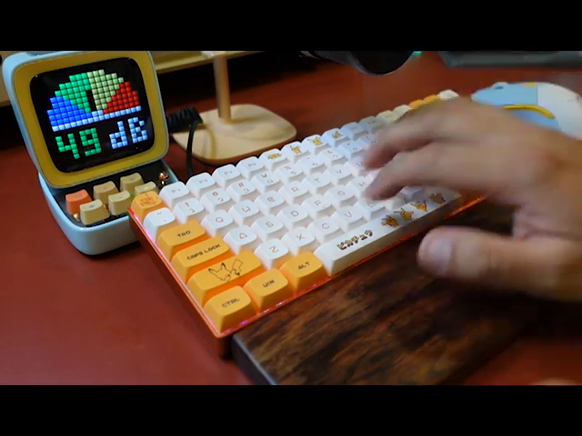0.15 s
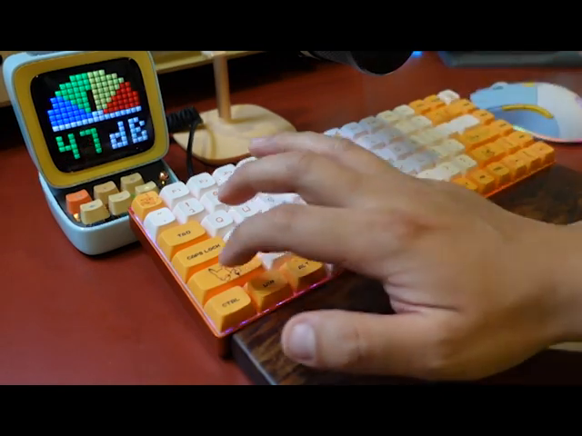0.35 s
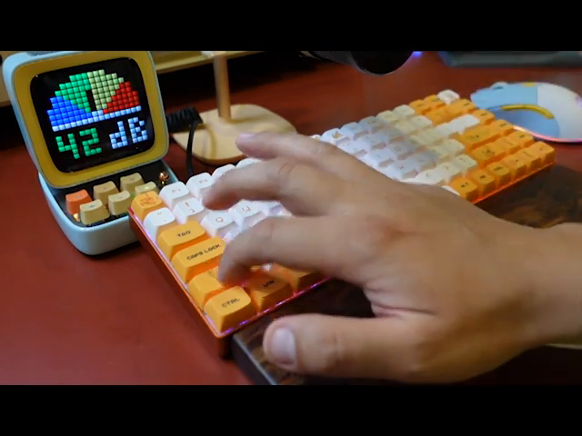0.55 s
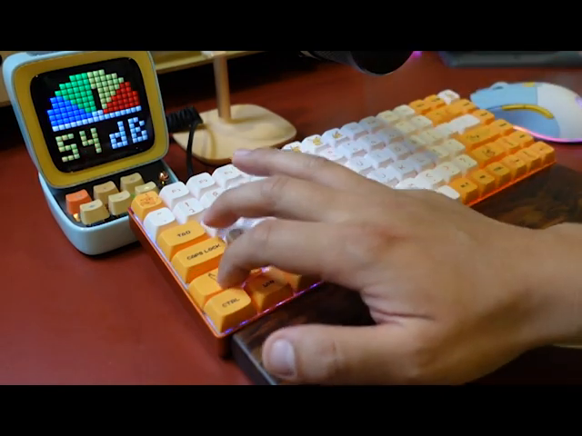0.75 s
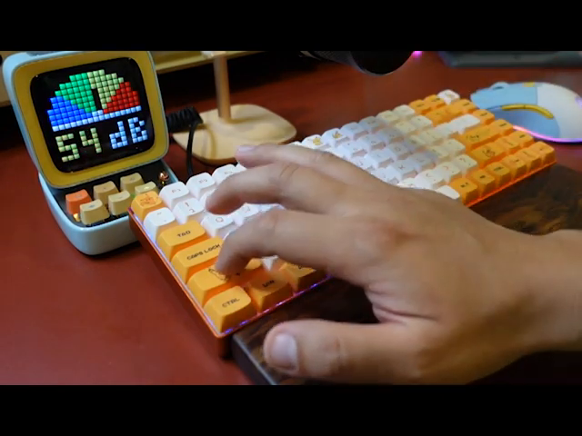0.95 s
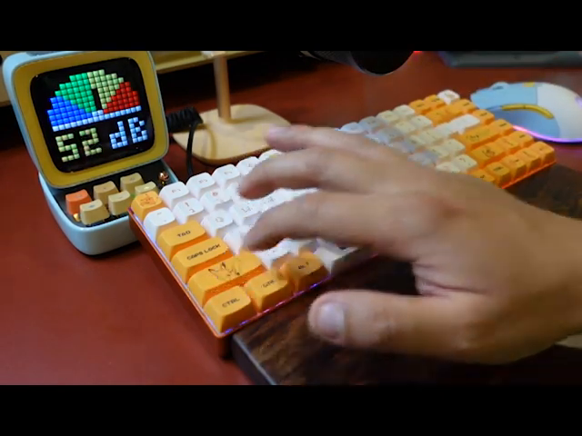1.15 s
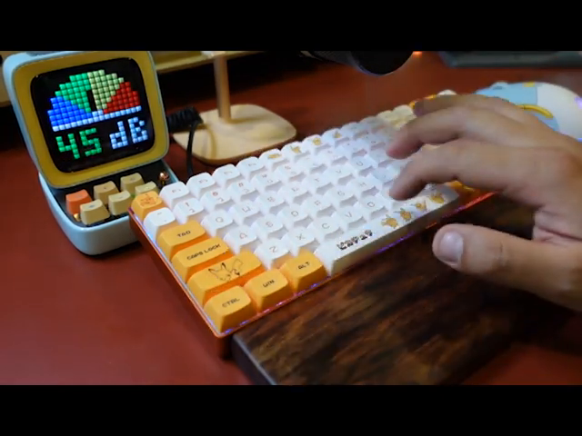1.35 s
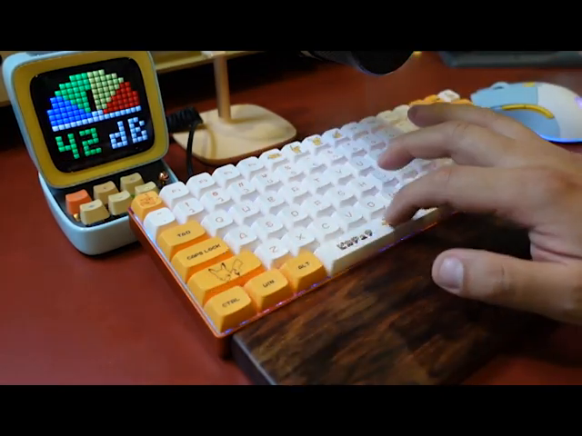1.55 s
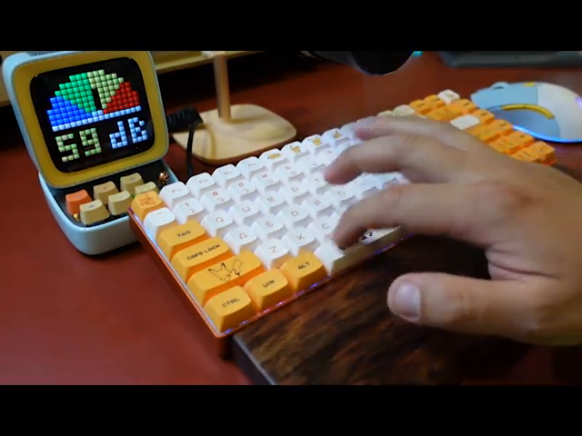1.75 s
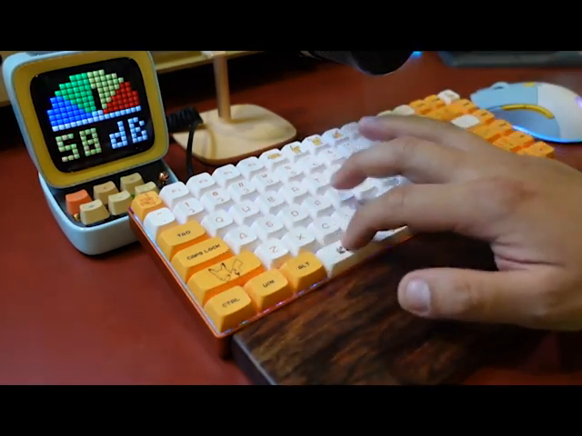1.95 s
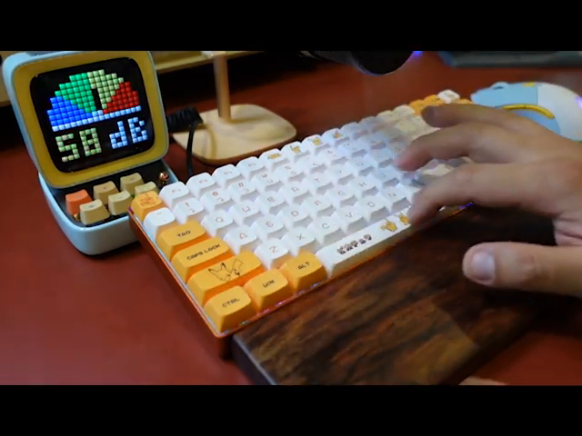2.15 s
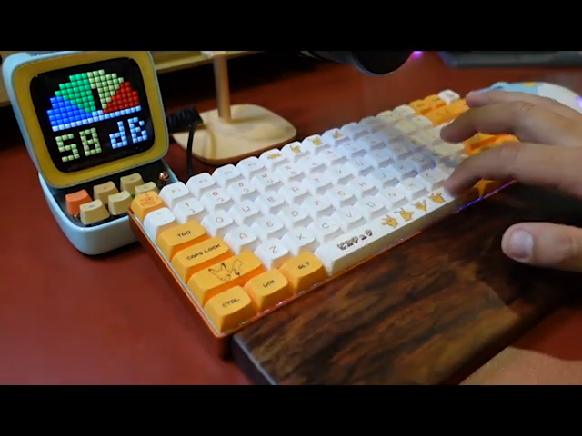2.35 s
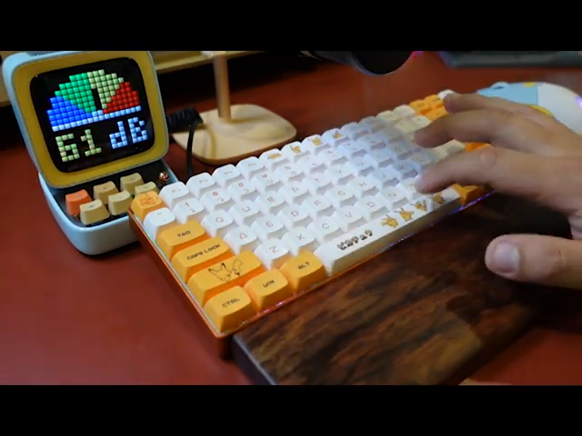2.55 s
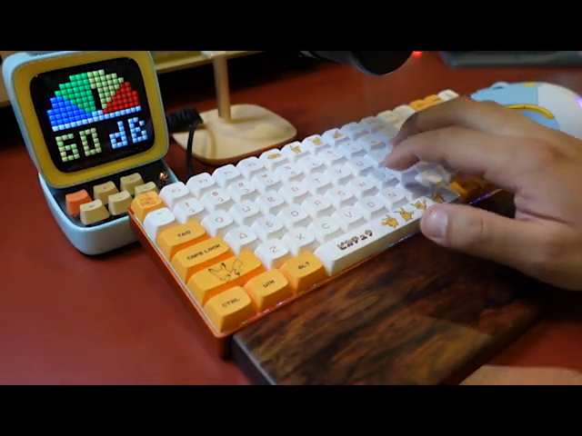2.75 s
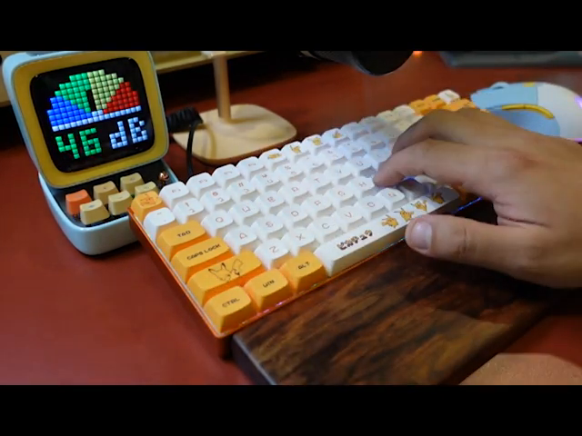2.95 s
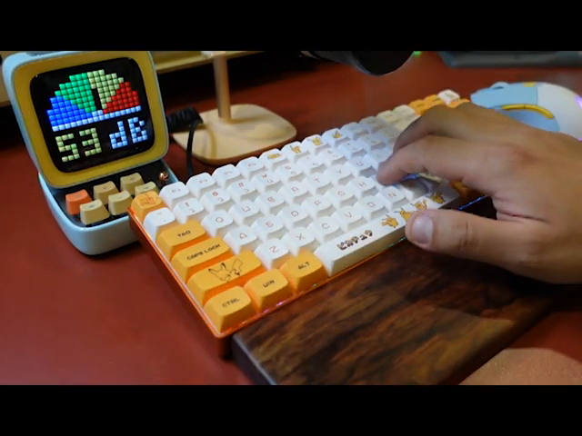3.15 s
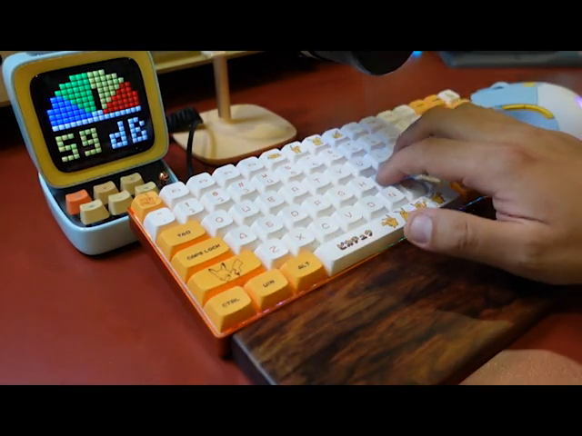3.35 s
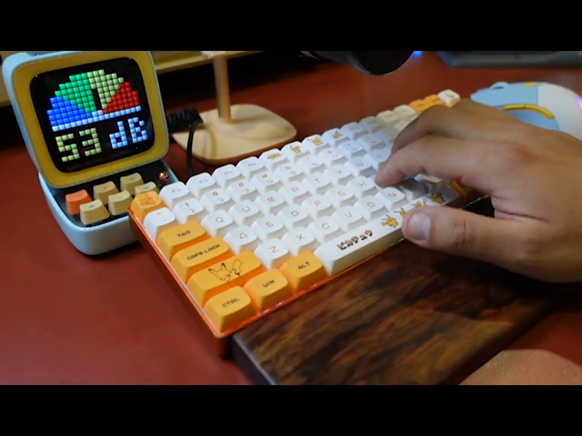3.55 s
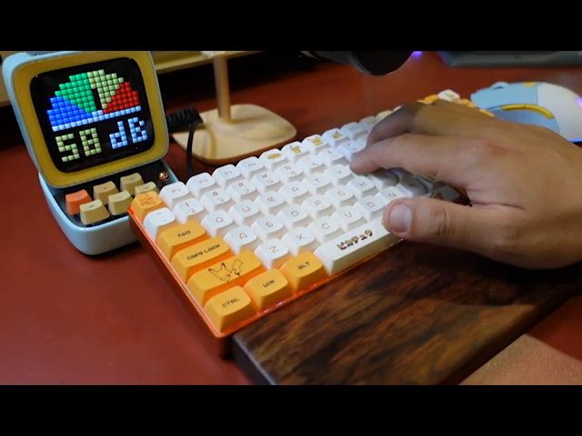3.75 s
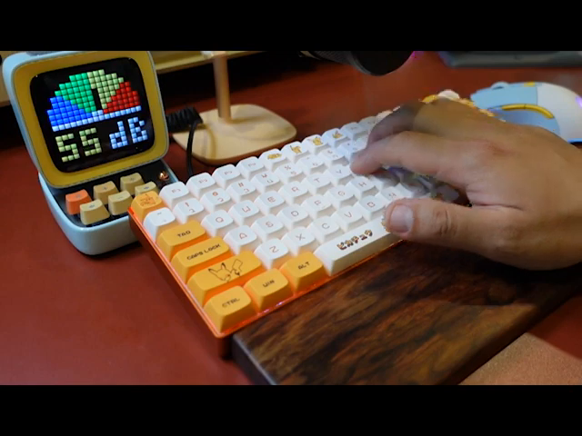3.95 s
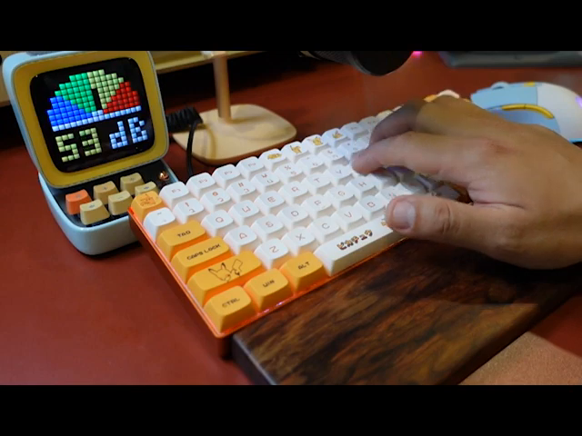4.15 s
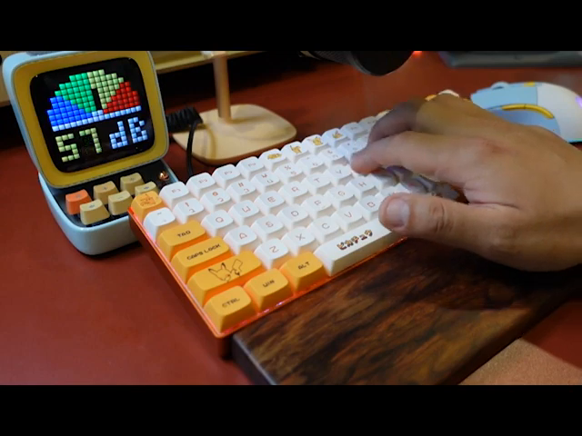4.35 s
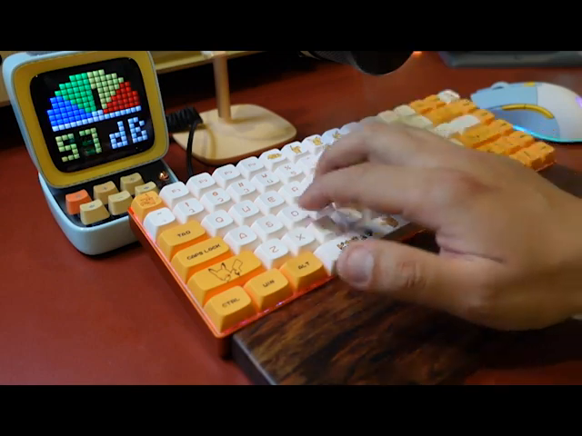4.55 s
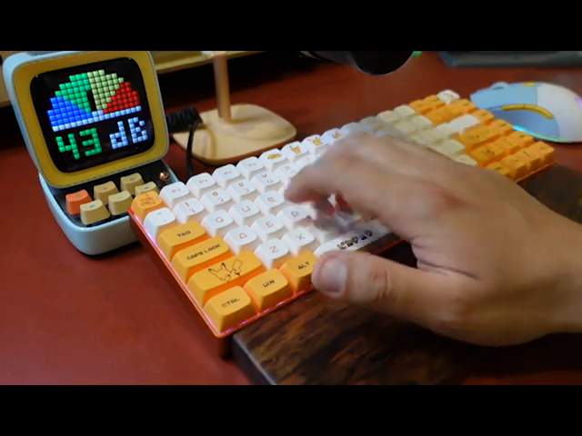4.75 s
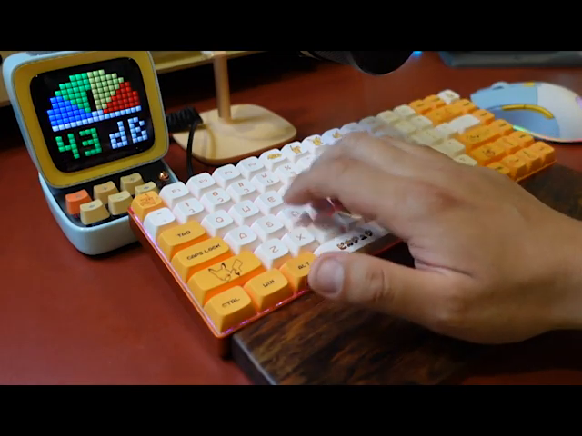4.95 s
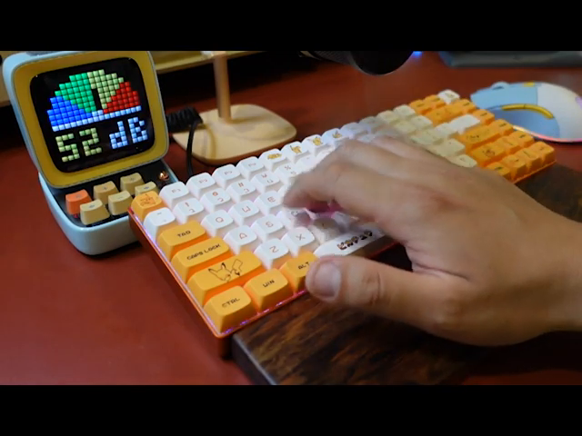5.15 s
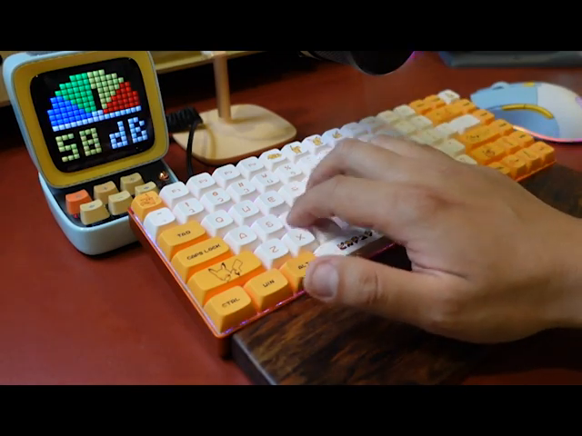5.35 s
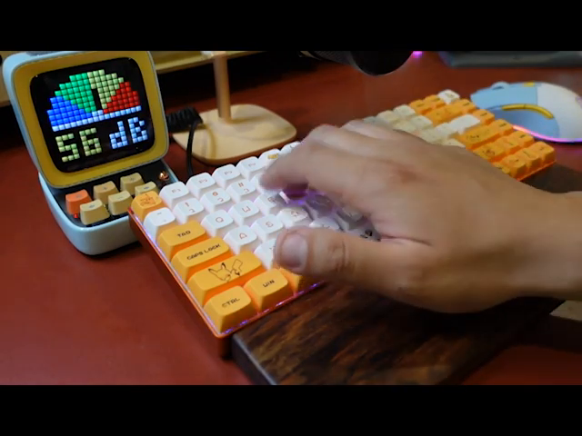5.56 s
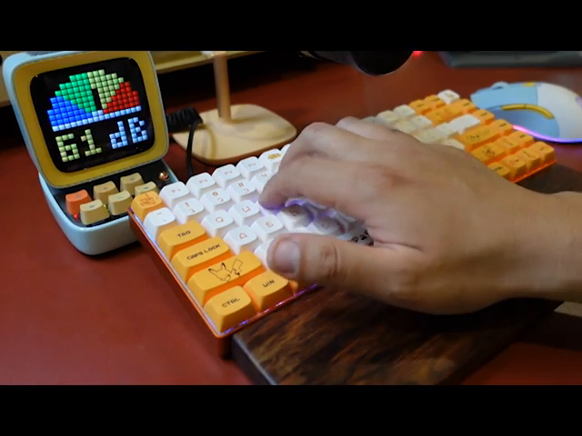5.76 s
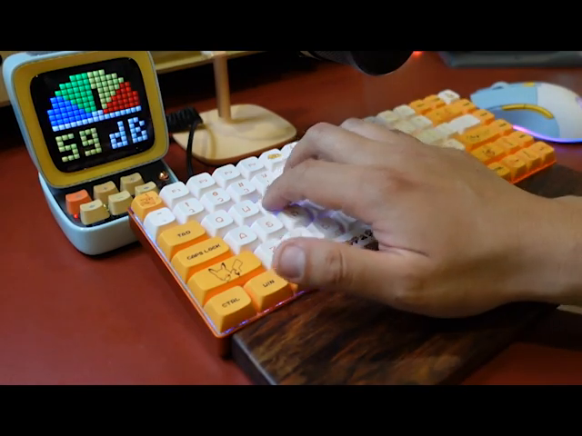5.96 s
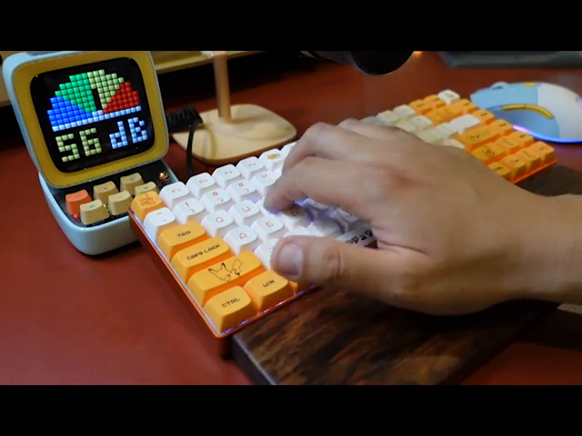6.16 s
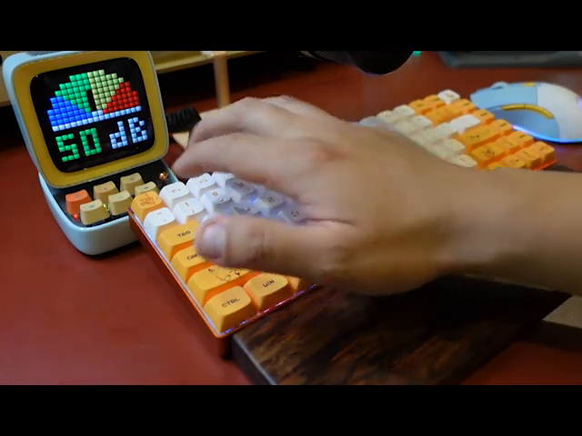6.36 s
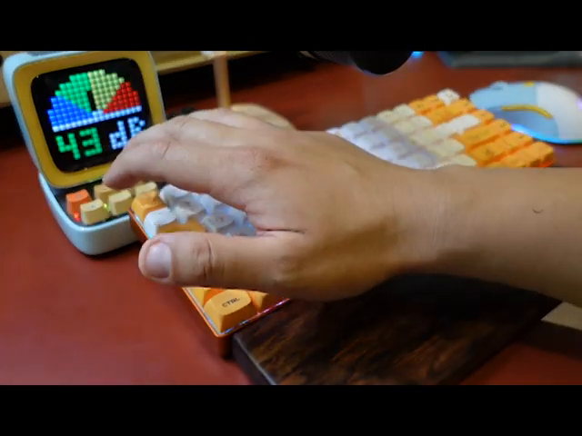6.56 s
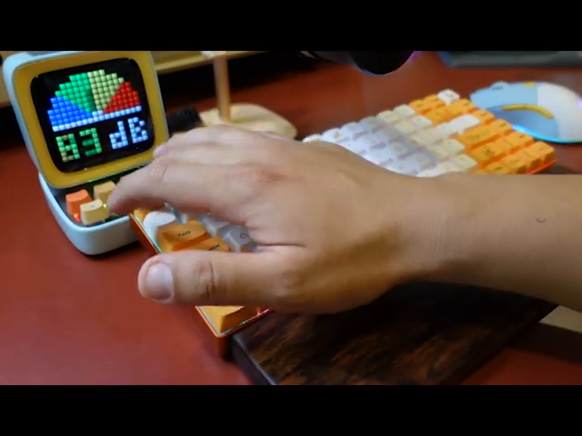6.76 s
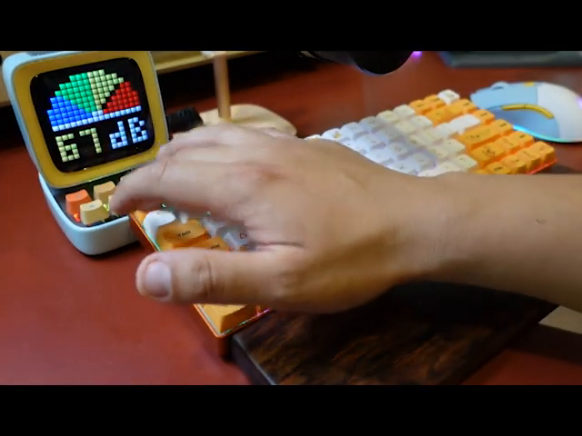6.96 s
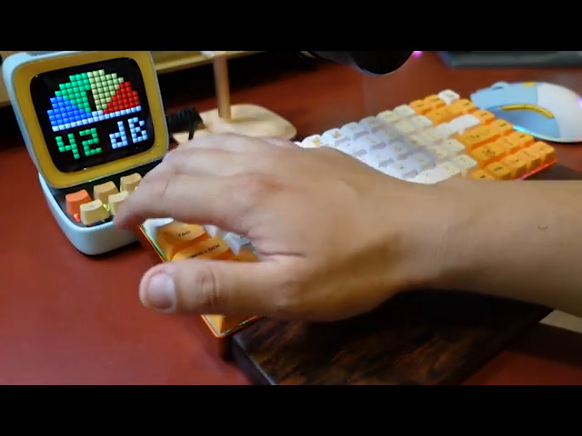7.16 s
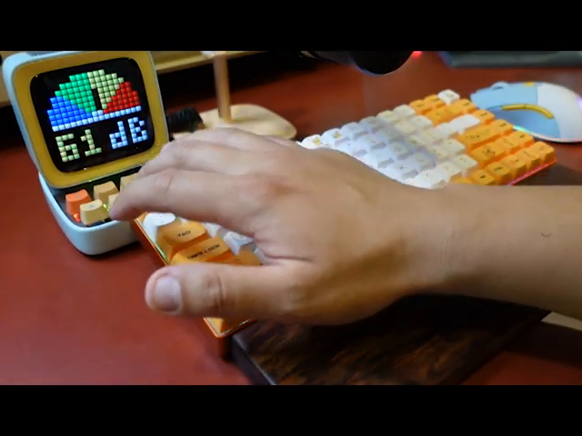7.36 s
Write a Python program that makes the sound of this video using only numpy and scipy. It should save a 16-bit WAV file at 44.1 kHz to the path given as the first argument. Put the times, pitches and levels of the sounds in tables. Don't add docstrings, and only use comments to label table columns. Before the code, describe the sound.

One hand tests a clicky-clacky keyboard on a wooden desk, from steady taps to rippling runs to sparse firm presses, over faint fan hum.

```python
import sys
import numpy as np
from scipy import signal
from scipy.io import wavfile
from scipy.ndimage import uniform_filter1d

SR = 44100
rng = np.random.default_rng(int(sys.argv[2]) if len(sys.argv) > 2 else 0)


def wav_out(sig):
    wavfile.write(sys.argv[1], SR, np.round(np.clip(np.atleast_2d(sig).T, -1, 1) * 32767).astype(np.int16))


def rack_gain(trim_db):
    fader = np.asarray(trim_db, float)
    return 10 ** (fader / 20)


N = 326781
LEAD = SR // 10


def evened(x):
    return x / np.sqrt(np.mean(x ** 2) + 1e-20)


def peaked(x):
    return x / (abs(x).max() + 1e-20)


def read(points, hz):
    f, value = np.transpose(points)
    return np.interp(np.log(hz + 1), np.log(f + 1), value)


def add(mix, s, sound):
    part = mix[LEAD + round(s * SR):][:len(sound)]
    part += sound[:len(part)]


def ring(modes, seconds, swell_s):
    t = np.arange(round(seconds * SR)) / SR
    dying = sum(rack_gain(db - 60 * t / t60) * np.sin(2 * np.pi * hz * t) for hz, db, t60 in modes)
    return dying * (1 - np.exp(-t / swell_s)) ** 2


def hush():
    # (frequency [Hz], level [dB per Hz])
    colour = [(20, -1), (50, -4), (97, -4), (150, -12), (200, -6.5), (300, -18), (700, -18.5),
              (1000, -22.5), (2400, -28), (4900, -46.5), (12000, -47.5), (15600, -46), (16200, -69)]
    # (frequency [Hz], level [dB])
    hum = [(97, -61), (198, -70)]
    frames, hz = N // 512 + 5, np.fft.rfftfreq(2048, 1 / SR)
    a, b, patches = rng.standard_normal((frames, 1025, 3)).T
    patches = uniform_filter1d(patches, 20, 0)
    patches = evened(uniform_filter1d(patches, 8, 1))
    z = (a + 1j * b) * rack_gain(read(colour, hz)[:, None] + 1.1 * patches)
    noise = signal.istft(z, nperseg=2048, noverlap=1536)[1][:N]
    waver = 1 + .01 * evened(uniform_filter1d(rng.standard_normal(N), 4000))
    turns = np.cumsum(waver) / SR
    fan = sum(rack_gain(db + 1.5) * np.sin(2 * np.pi * f * turns) for f, db in hum)
    return rack_gain(-52.5) * evened(noise) + fan


def key_parts(rings, body_hz):
    hz, width, db = np.transpose(rings)
    chance = rng.standard_normal((2, len(hz)))
    low = hz < 1700
    strongest = hz[low][np.argmax(db[low])]
    hz = hz * np.where(low, body_hz / strongest, 1 + .018 * chance[0])
    db = db + 20 * np.log10(width) + 2.7 * chance[1]
    t60 = np.clip(2.48 / width, .002, .018)
    modes = np.transpose([hz, db, t60])
    body, cap, stem = hz <= 1700, (hz > 1700) & (hz <= 6000), hz > 6000
    return ring(modes[body], .03, .00035), ring(modes[cap], .03, .00012), ring(modes[stem], .03, .00008)


def slide(body, cap, stem, slide_s):
    scrape = rng.standard_normal(1500)[:round(slide_s * SR)]
    key = (body + 0.75 * cap + .5 * stem)[:60]
    rub = evened(np.convolve(scrape, key)[:len(scrape)]) + 0.1 * scrape
    return rub * signal.windows.tukey(len(rub), .3)


def rattle(rebound_s, rebound):
    t = np.arange(400) / SR
    scatter = rng.standard_normal(400) * (rng.random(400) < .08)
    contacts = 0.44 * scatter * np.exp(-t / 0.00093) + (t == 0)
    contacts[round(rebound_s * SR * rng.uniform(.9, 1.1))] += rebound
    return contacts


def clack_of(contacts, body, cap, stem, cap_db, stem_db):
    body, cap, stem = [peaked(np.convolve(contacts, part)) for part in (body, cap, stem)]
    return body + rack_gain(cap_db) * cap + rack_gain(stem_db) * stem


def case_knock():
    # (frequency [Hz], level [dB], t60 [s])
    case = [(248.7, -3.5, 0.11), (303.3, 2.5, 0.048), (374.6, 0.5, .03)]
    return -peaked(ring(case, .15, 0.00081))


def desk():
    # (frequency [Hz], level [dB], time to the largest swing [s])
    top_swings = [(89.8, 4, 0.024), (47, -9.5, 0.029), (25.7, -15.5, .03)]
    # (frequency [Hz], level [dB], t60 [s])
    stand = [(97.7, -19.5, 0.9)]
    t = np.arange(SR // 2) / SR
    swings = 0
    for hz, db, peak_s in top_swings:
        growth = (t / peak_s * np.exp(1 - t / peak_s)) ** 3
        swings = swings + rack_gain(db) * np.sin(2 * np.pi * hz * t) * growth
    return -swings - ring(stand, .5, 0.068)


def strokes(rows, rings, feel):
    case_db, slide_db, slide_s, rebound_s, rebound = feel
    clack, shake, boom = np.zeros((3, N + LEAD))
    knock, sway = rack_gain(case_db) * case_knock(), desk()
    for s, db, body_hz, cap_db, stem_db, push in rows:
        parts = [peaked(part) for part in key_parts(rings, body_hz)]
        contacts = rattle(rebound_s, rebound * (1 if push < 0 else .3))
        add(clack, s, rack_gain(db) * clack_of(contacts, *parts, cap_db, stem_db))
        add(clack, s - slide_s, rack_gain(db + slide_db) * slide(*parts, slide_s))
        add(shake, s, np.array([rack_gain(db + 0.31 * stem_db)]))
        case_push = push / 100 + np.copysign(0.096 * rack_gain(db), push)
        add(boom, s + 0.0011, case_push * knock)
        add(boom, s + 0.0037, push / 100 * sway)
    return clack, shake, boom




def wide_key():
    # (time [s], levels and pitch as above)
    earlier = [(-0.0317, -16.5, 1040, 5, -4, 2.47)]
    # (time [s], levels and pitch as above)
    tried = [(0.42, -17, 1280, 2, -16, 1.5), (0.4938, -20.5, 1150.0, -3, -29, 1),
             (0.5668, -15, 1260, 1, -14.5, 2.5), (0.6458, -18.5, 1280, -7, -25.0, -1.5),
             (0.7198, -15.5, 1300, -2.0, -20, 2), (0.797, -20, 1090, -5, -22.0, -1.0),
             (0.871, -19, 1310.0, 2, -19, 1.8), (0.9375, -20, 1060, -4.5, -24, -1.6),
             (1.004, -14, 1270, 0, -18, 3), (1.0894, -16.5, 1260, -2.5, -23.0, 0.7)]
    # (frequency [Hz], width [Hz], level [dB])
    rings = [(780, 200, -9.5), (1220, 350, 0), (1940, 270, -4.5), (2375, 350, -13.5), (3500, 235, -5.5),
             (4270, 410, -17), (5360, 350, -24.5), (7280, 470, -29), (9300, 680, -30.5), (11600, 400, -27),
             (14100, 900, -40)]
    feel = (-1, -35, 0.08, .0055, 0.56)
    return strokes([*earlier, *tried], rings, feel)


def long_bar():
    # (time [s], levels and pitch as above)
    tried = [(1.4566, -20, 1100, 12.5, -16.5, 3.5), (1.541, -21.5, 1160, 8.5, -21.5, -3.5),
             (1.6324, -20.5, 1130, 13.5, -16.5, 4), (1.694, -16.5, 1170, 10.5, -24, -4.5),
             (1.7048, -22, 1120, -1, -17, -3), (1.7712, -37, 1250, 4.5, -18, 0.3),
             (1.7834, -18, 1180, 13.5, -2.5, 6), (1.7993, -47, 1350, 11, -4.5, 2),
             (1.8661, -20, 1185, 11.5, -19.5, -4.5), (1.8734, -27, 1140, 1, -25, -3),
             (1.9462, -19.5, 1170, 14, -11, 4.5), (2.036, -20.5, 1195, 11.5, -16, -4.5),
             (2.1247, -21, 1020, 14.5, -13, 3.5), (2.1965, -23.5, 1120, 8, -13, -5),
             (2.2078, -30, 1170, 4, -16, -1.1), (2.2544, -27, 1210, -10, -19, 1),
             (2.2774, -22.5, 1550, 15.5, -12.5, 3.5), (2.348, -23.5, 1120, 10, -14, -6),
             (2.3603, -24, 1130, 1, -18, 2.0), (2.4258, -27, 1190, 0, -12, -1.4),
             (2.4403, -18.5, 970, 13.5, -6, 3.5), (2.5212, -18.5, 1130, 6.5, -16, -6),
             (2.535, -24, 1130, 6, -18, 2.5)]
    # (frequency [Hz], width [Hz], level [dB])
    rings = [(783, 150, -9.5), (1130, 170, -3), (1960, 700, 4), (2705, 430, 1.5), (3920, 300, -12.5),
             (5640, 550, -33.5), (6950, 440, -36.5), (8730, 960, -30), (11420, 1200, -28),
             (14400, 840, -33.5)]
    feel = (6, -30.5, .013, .0024, .5)
    return strokes(tried, rings, feel)


def letter_keys():
    # (time [s], levels and pitch as above)
    rolls = [(2.857, -52, 1200.0, 6.5, -4, 0.8), (2.891, -14.0, 1120, -5, -19, 1),
             (2.9097, -18, 1280, 7, 0.5, 3), (2.9383, -14, 1220.0, -1.5, -11.5, 1.5),
             (2.987, -21, 1100, -11.5, -17, 0.9), (3.0062, -23.5, 1280.0, 1, -10.0, -0.5),
             (3.0293, -14.5, 1220.0, -1.5, -11, 1), (3.0785, -34.5, 1250.0, -5, -16.5, 1.2),
             (3.0991, -15.0, 1130.0, -2.5, -18.5, 2), (3.1224, -20.5, 1310.0, 10, 3, 5),
             (3.1329, -31, 1060.0, 0.5, 4, -1.5), (3.1423, -10, 1220.0, -3, -7.5, 3),
             (3.1851, -17.5, 1270, -6, -11.0, -1.5), (3.1974, -19.5, 1110, -5, -9, -0.7),
             (3.2397, -21.5, 1080.0, 4.5, -8.0, 0.7), (3.2907, -34, 1230.0, -1.0, -8.0, 0),
             (3.3068, -13.5, 1180.0, -1.5, -12.5, 3.5), (3.318, -17.0, 1160, 5, -3, 1),
             (3.3344, -35, 1320.0, -5.0, -3.5, -0.7), (3.3491, -15, 1240, -2.5, -9, 1.5),
             (3.38, -17.0, 1040.0, -7, -13, -0.8), (3.3931, -23.5, 1280, 4.5, -8, -1.5),
             (3.422, -20, 1320, 3, -14, -0.5), (3.4722, -34.5, 1270.0, 2, -8.5, 0.5),
             (3.4836, -12.5, 1100, -4, -7.5, 2), (3.499, -17.5, 1180, 7.5, -5, 1.6),
             (3.5148, -37, 1480.0, -2.5, -1.0, 1), (3.5268, -12.5, 1220.0, 0.5, -5, 3),
             (3.5663, -15, 1100, -9.5, -18, -0.1), (3.5818, -23.5, 1290.0, 0.5, -8, -1.1),
             (3.6191, -20.5, 1270, 4.5, -5.5, 0.3), (3.7041, -16.5, 1090, 0.5, -9, 1.6),
             (3.7246, -22.0, 1010.0, 8, -10, 2.5), (3.7508, -13, 1190.0, 2, -4.5, 3),
             (3.7804, -18.5, 1060, 1.0, -7.0, -0.6), (3.8025, -24.5, 1020.0, -1, -1.5, 0.2),
             (3.824, -20, 1120, 0, -8.5, -1), (3.9035, -17, 1100, 0.5, -9, 2),
             (3.9167, -25.0, 1030.0, 6.5, -8.5, 1), (3.9308, -11.5, 1200.0, 2, -2.5, 4),
             (3.9699, -17.5, 1140, -9, -7.0, 1.5), (3.9864, -23.5, 980, 4.0, -3, 1.8),
             (4.0068, -16.5, 1130.0, 0.5, -4, -1.1), (4.096, -16, 1110, 2, -6, 2),
             (4.1125, -19.5, 1020, 5.5, -7, 3.5), (4.1263, -39, 1220.0, -7, -6, 0.9),
             (4.1379, -17.5, 1190.0, 1.5, -6, 1.3), (4.1672, -17.5, 1070, -2.0, -4.0, -1.5),
             (4.1795, -23.5, 1320.0, 1, -9, 0.5), (4.2066, -19.5, 1170.0, -0.5, -6, 0.5),
             (4.2787, -16, 1100, 2, -4.0, 2), (4.2913, -19.5, 1020, 0.5, -19, 0.4),
             (4.313, -12, 1190.0, 3.5, -3.5, 3), (4.3538, -18.5, 1040.0, -2, -9, 0),
             (4.3656, -27, 1010.0, -0.5, -1, -1), (4.3924, -20, 1150.0, 1.0, -5, -0.2),
             (4.7344, -38, 1220.0, 4.0, -3, 1.5), (4.7496, -20, 1335, 3.5, -13.5, 2),
              (4.7657, -33, 1340, -7, -11, 1.5), (4.778, -14.5, 1120, -1, -7, 0.5),
              (4.7971, -25, 1440.0, -12, -23.0, 1.4), (4.8333, -21, 1090.0, -0.5, -6, -1.7),
              (4.8538, -21, 1360, -5, -23, 0), (4.8687, -21, 1420, -6.5, -15, 0.7),
              (4.9412, -38, 1150.0, 2, -2, 0.7), (4.9595, -22.5, 1340, 1.0, -11.0, 0.5),
              (4.9781, -16, 1090, 0, -4.5, 3), (4.9884, -12, 1440.0, -2.5, -17, 2),
              (5.0254, -24, 1360.0, 6.5, 1.5, -2.1), (5.035, -20.0, 1070.0, -4, -18, 1.5),
              (5.0643, -16, 1080, -4.5, -10, -0.3), (5.1485, -24.5, 1340.0, 1.0, -17, 2.9),
              (5.1611, -13.5, 1130, 0.0, -6, 0), (5.1889, -18, 1430, -4.5, -14, 1.5),
              (5.2145, -25.5, 1360.0, 10, 4, -2), (5.2269, -17.5, 1090.0, -3.5, -9.5, 1.5),
              (5.2471, -17.5, 1070, -2.5, -10, 1), (5.3041, -37.0, 1180, 0, -1, 1.5),
              (5.3211, -23, 1370, 1.5, -11, 1.7), (5.339, -17.0, 1050, 1, -5.5, 2.5),
              (5.3462, -36, 1240.0, -13, -6.0, 0.5), (5.3586, -14, 1390, -1, -7.5, 2.5),
              (5.4051, -22, 1280, 2, -8, 1), (5.4143, -18, 1060, -2, -13.0, -1.5),
              (5.4392, -17.5, 1430, -2, -10.5, -0.4), (5.5399, -18, 1160, 4.5, -1, 2.1),
              (5.5552, -17.5, 1170, 9.5, 5, 3), (5.584, -22, 1020.0, 5.5, -3, 1.7),
              (5.6187, -21, 1090.0, -2.5, -2, -1.5), (5.6321, -20, 1050, 5.0, -11, 0.6),
              (5.6457, -24.5, 1470, 2.5, -5, -0.5), (5.719, -38, 1250.0, -5, -18.5, 1),
              (5.7336, -20, 1170, 3.5, -6, 0.5), (5.7424, -17.5, 1130.0, 7, 2.5, 3.5),
              (5.7632, -17, 1400, 9.0, 3.5, 1.7), (5.8092, -20, 1150.0, 6, -6, -2.5),
              (5.8214, -17, 1110, -2, -10, 1), (5.8399, -26.5, 1410, 3.5, -8, 0.6),
              (5.926, -19.5, 1180, 6, -3, 0.5), (5.9357, -16, 1170, 4, -3.5, 3.5),
              (5.9573, -26, 1020, 9.5, -2.0, 0.9), (5.9973, -19.5, 1110.0, 4, -2, 0.0),
              (6.0056, -20.5, 1080, 1, -4, 0.5), (6.028, -22, 1450, 6, -9, 0.2),
              (6.1031, -17.5, 1160, 3.5, -5, 2.1), (6.1212, -24, 1140.0, 3, -12, 0),
              (6.1429, -18.5, 1420, 9.5, 5.5, 3.5), (6.1887, -19.5, 1020.0, 2.5, -5, -0.8),
              (6.2035, -20.5, 1080, 0, -6.5, 0.3), (6.232, -25, 1050, 3, -1, 0.46)]
    # (frequency [Hz], width [Hz], level [dB])
    rings = [(830, 230, -18), (1220, 215, 0), (2163, 530, -3.5), (2937, 480, -14), (3840, 370, -12),
             (4780, 170, -31.5), (6760, 520, -35), (8355, 600, -6), (9450, 210, -15), (11150, 370, -20),
             (11620, 1200, -16.5), (14200, 700, -49.5)]
    feel = (-10, -36.5, 0.2, .002, 0.52)
    return strokes(rolls, rings, feel)


def corner_key():
    # (time [s], levels and pitch as above)
    tried = [(6.6694, -36, 1410, -14, -17, -0.16), (6.6776, -11.5, 1220, -1, -18.5, 0.78),
             (6.6929, -34, 1310, -6, -14, 0.96), (6.762, -20.5, 1280, -3, -17, 0.44),
             (6.9577, -9, 1220, -1, -16, 0.43), (6.9729, -29, 1320, -2, -19, 1.1),
             (7.0308, -20, 1360, -4, -18, 0.78), (7.1128, -15.5, 1220, -5.5, -21.5, 0.73),
             (7.181, -18.5, 1200, -5, -18.5, 0.3), (7.2696, -12.5, 1170, -1, -18, 0.59),
             (7.2849, -32, 1320, -2, -20, 1.27), (7.3388, -18.5, 1340, -3.5, -16.5, 0.6)]
    # (frequency [Hz], width [Hz], level [dB])
    rings = [(820, 160, -13.5), (1240, 243, 0), (1900, 173, -1.5), (2910, 330, -15.5), (4250, 380, -21.5),
             (4770, 210, -32), (5640, 390, -31), (6650, 480, -27), (8170, 540, -29.5), (11000, 720, -28.5),
             (13800, 800, -50)]
    feel = (-5, -31, 0.2, .0015, 0.64)
    return strokes(tried, rings, feel)


def springs(shake):
    # (frequency [Hz], width [Hz], level [dB])
    coils = [(6960, 64, -12.5), (8290, 500, -7.5), (10970, 120, -5)]
    fading = signal.lfilter([1], [1, -rack_gain(-60 / 0.16 / SR)], shake)
    fizz = rng.standard_normal(len(shake))
    bands = 0
    for hz, width, db in coils:
        b, a = signal.iirpeak(hz, hz / width, SR)
        bands = bands + rack_gain(db) * evened(signal.lfilter(b, a, fizz))
    return rack_gain(-42.5) * fading * bands


def room(x):
    # (frequency [Hz], t60 [s])
    decay = [(300, 0.49), (1500, 0.27), (4000, 0.29), (12000, 0.18)]
    # (frequency [Hz], level [dB])
    colour = [(300, 5), (1500, -2), (4000, -0.5), (6000, 4), (12000, 2)]
    taps = np.zeros(SR // 2)
    at = np.arange(140, SR // 2 - 20, 20)
    taps[at + rng.integers(0, 20, len(at))] = rng.choice([-1., 1.], len(at))
    hz, t, z = signal.stft(taps, SR, nperseg=256)
    z *= rack_gain(read(colour, hz)[:, None] - 60 * t / read(decay, hz)[:, None])
    tail = signal.istft(z, SR, nperseg=256)[1]
    return signal.fftconvolve(x, tail / np.linalg.norm(tail))[:len(x)]


def scene():
    keys = [wide_key(), long_bar(), letter_keys(), corner_key()]
    clack, shake, boom = np.sum(keys, axis=0)
    no_bass = signal.butter(2, 620, "high", fs=SR, output="sos")
    clack = signal.sosfilt(no_bass, clack)
    keyboard = clack + springs(shake) + boom + rack_gain(-18.5) * room(clack)
    return (keyboard[LEAD:] + hush())[None]


def roll_off(x):
    return signal.sosfilt(signal.butter(12, 16830, fs=SR, output="sos"), x)


def record(dry):
    rolled = signal.sosfilt(signal.butter(8, 16300, fs=SR, output="sos"), dry)
    return roll_off(rolled)


dry = scene()
out = record(dry)
wav_out(out)
```